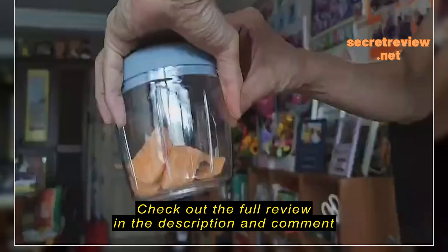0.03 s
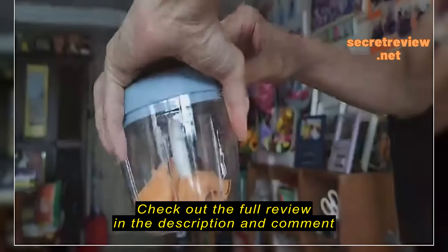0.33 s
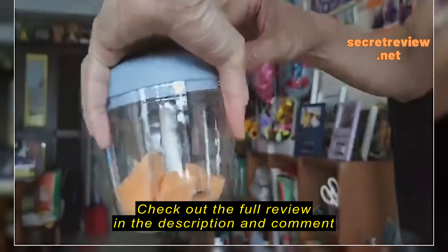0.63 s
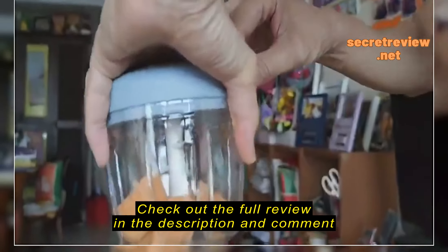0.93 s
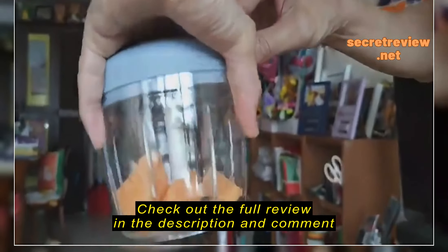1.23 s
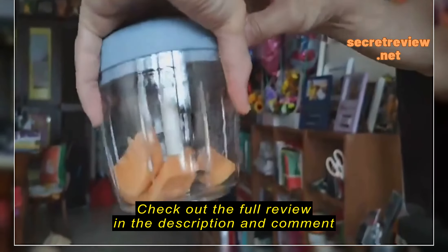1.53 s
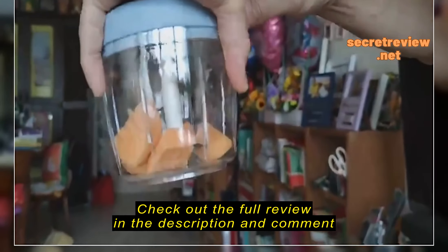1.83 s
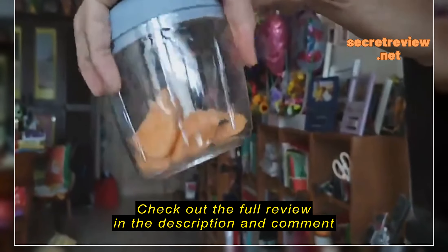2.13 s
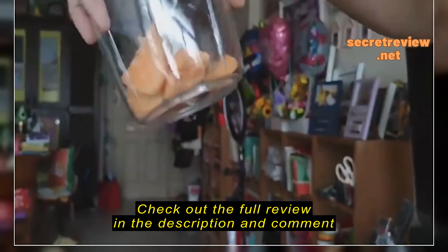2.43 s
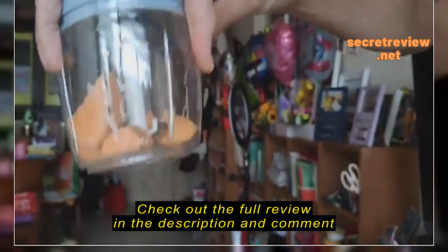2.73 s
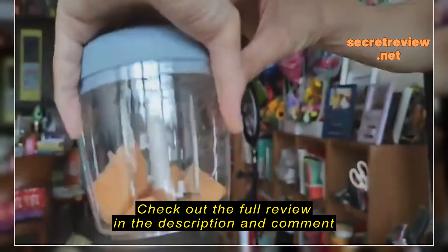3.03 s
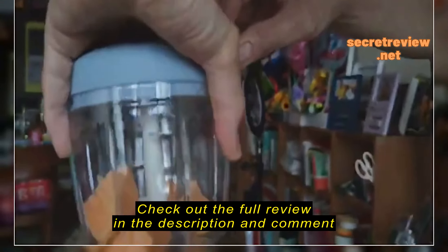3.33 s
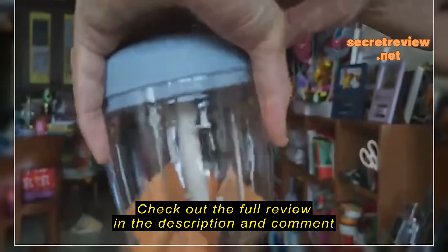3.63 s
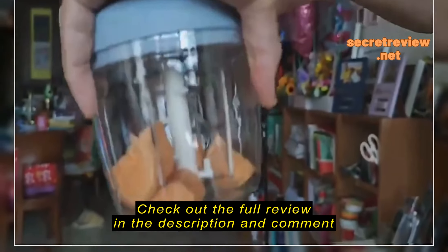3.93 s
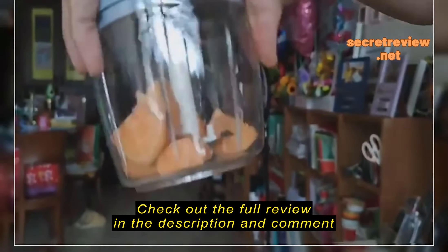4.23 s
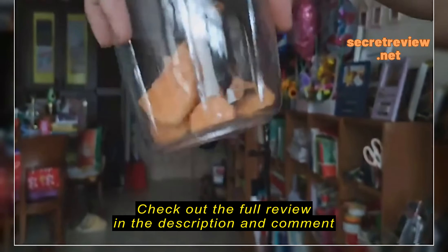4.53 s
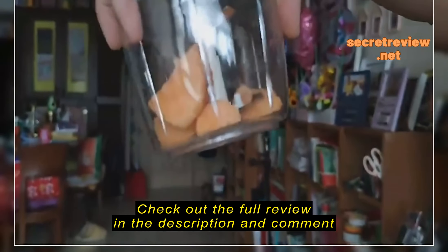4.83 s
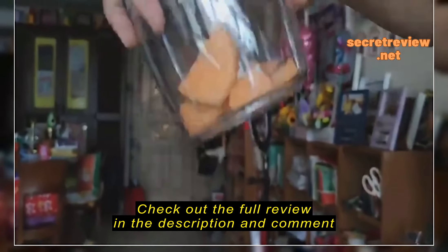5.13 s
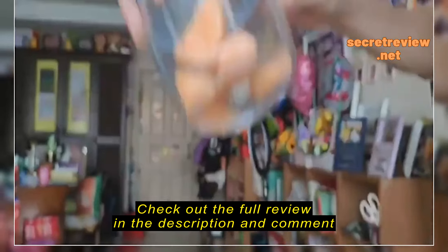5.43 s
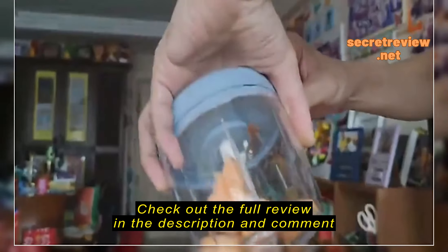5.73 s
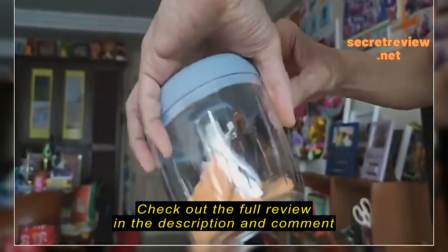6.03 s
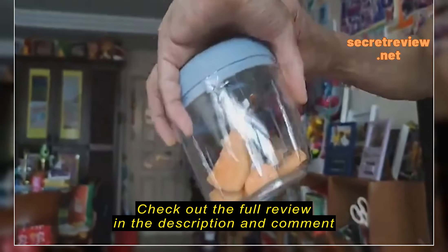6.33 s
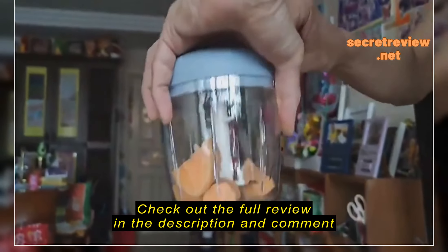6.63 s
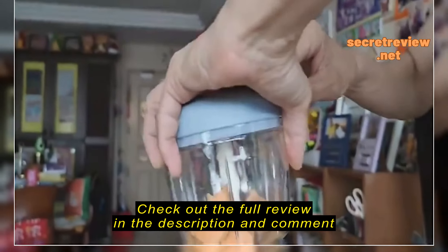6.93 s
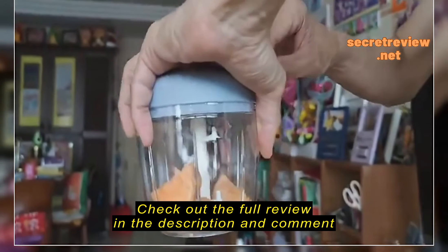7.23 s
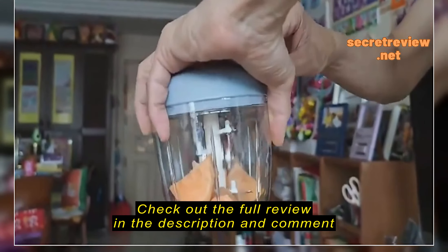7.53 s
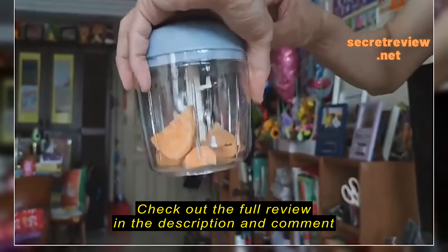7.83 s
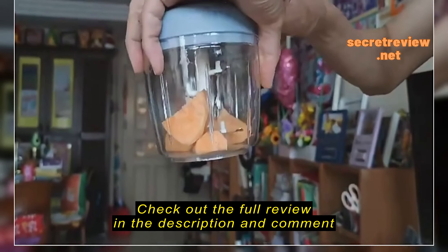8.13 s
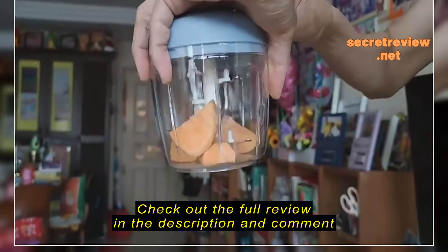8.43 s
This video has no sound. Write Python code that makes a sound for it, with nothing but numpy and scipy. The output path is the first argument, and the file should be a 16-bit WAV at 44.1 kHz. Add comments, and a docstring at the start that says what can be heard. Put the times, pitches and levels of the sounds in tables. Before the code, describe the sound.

Hard vegetable chunks are shaken in a lidded plastic cup, close to the microphone in a small, quiet room. From about 0.3 seconds they hit the wall in quick clusters of dry clacks, often paired, four or five a second, growing a little louder until 2.7 seconds. A short lull holds only faint taps and barely audible finger rubbing on the lid. Firm shaking resumes from 3.4 to 4.7 seconds, followed by a few light taps, then another run of clacks from 5.4 to 6.2 seconds. The pieces then shift more sparsely, with a duller knock near 6.9 seconds and tiny ticks after it. The loudest, sharp clack comes at 8 seconds, followed by two softer taps by about 8.4 seconds. A short reverberation trails the knocks, and faint hiss and a low rumble lie underneath throughout.

```python
"""In a small, quiet room, hard vegetable chunks are shaken in a lidded plastic cup near a two-port microphone.
At each turn of the hand they slide along the wall and land in a quick cluster of clacks, each impact
exciting the damped modes of the cup; between shakes a few pieces tap lightly and fingers rub on the lid.
A short reverberation follows the knocks, over faint hiss and a low rumble."""
import sys
import numpy as np
from scipy import signal
from scipy.fft import rfft, irfft, next_fast_len
from scipy.io import wavfile

SR = 44100
rng = np.random.default_rng(int(sys.argv[2]) if len(sys.argv) > 2 else 0)


def waveform_to_disk(signal):
    """Save audio, clipped to [-1, 1], as 16-bit WAV at the path in sys.argv[1]."""
    frames = np.transpose(np.atleast_2d(signal))
    scaled = np.clip(frames, -1, 1) * 32767
    samples = np.round(scaled).astype(np.int16)
    wavfile.write(sys.argv[1], SR, samples)


N = 373527


# The pile lands at each turn of the hand, one chunk on a corner and one flat. Each row: start in seconds,
# relative clack level in dB, thud and tick in dB over the clack, resonance of the struck spot in Hz,
# the flat chunk's delay in seconds, its clack in dB, its spot in Hz, and the skid level in dB.
PILE_LANDINGS = [(0.3189, -11.5, -9, 1, 2040, -.006, -16, 2450, -47.5),
                 (.4991, -19, -4.5, 7, 1660, .0048, -16.5, 2970, -40.5),
                 (0.7454, -12.5, -4, -2, 1500, -0.0065, -20, 850, -45.5),
                 (0.8746, -14.5, -4, 1, 2640, -0.0056, -15, 1730, -38),
                 (1.1057, -13, -10.5, -0.5, 3450, .0075, -8.5, 2760, -45),
                 (1.226, -12, -4, -5, 1610, 0.0063, -12.5, 815, -46),
                 (1.474, -13, -11, -5.5, 1890, -0.012, -13.5, 1510, -39),
                 (1.5991, -6.5, -11, -4.5, 2960, -0.0063, -14, 1560, -45),
                 (1.8376, -12, -11.5, -1, 1550, .0065, -8.5, 2680, -44),
                 (1.953, -6.5, -10.5, -6, 2510, 0.0026, -10.5, 3100, -48.5),
                 (2.2138, -7, -16, -1, 2400, 0.0042, -12.5, 2130, -37.5),
                 (2.343, -9, -6, -1, 1350, 0.0044, -11, 3070, -44),
                 (2.5884, -11, -15.5, -0.5, 2500, -0.014, -10.5, 2100, -37.5),
                 (2.7155, -8, -11, -5, 3000, -.014, -20, 700, -39),
                 (3.3839, -5, -14, -4.5, 2940, 0.0066, -18, 2820, -41.5),
                 (3.5957, -5, -6, 1, 3200, -0.004, -8.5, 1520, -40),
                 (3.8148, -8.5, -9, -1.5, 3020, 0.0069, -7, 2860, -42),
                 (3.982, -14, 3, 2, 690, -.005, -16.5, 860, -37),
                 (4.1849, -5.5, -9.5, 2, 1480, -.002, -6, 1040, -42),
                 (4.3257, -9, -8, -2.5, 2130, -0.0094, -9.5, 2050, -39.5),
                 (4.5417, -8.5, -15, -0.5, 2670, -.0106, -8.5, 1620, -40),
                 (4.6777, -14, -1, 1.5, 1500, -0.012, -17.5, 800, -36),
                 (5.398, -5, -11, 0.5, 1580, -0.0083, -10.5, 1330, -36.5),
                 (5.5552, -10.5, -1.5, -0.5, 2210, -0.0038, -9, 1490, -39),
                 (5.8027, -12, -10.5, 2, 2950, -0.0041, -10, 1480, -42.5),
                 (5.9506, -9, 1, -2.5, 1020, 0.0044, -13.5, 960, -40),
                 (6.2153, -11, -10, -1, 1800, -.0045, -10.5, 1780, -36),
                 (6.8798, -12.5, -1, -4, 1530, -.007, -22, 684, -40.5),
                 (8.0239, -.3, -9, -1.5, 1890, 0.006, -8.5, 1110, -51),
                 (8.2053, -15.5, -2.5, -3, 1730, .007, -19, 920, -43)]
# Pieces touch just before or after a landing, and a few tap between shakes.
# Each row: the first five columns of a landing.
LIGHT_TAPS = [(.3086, -22.5, -.5, -20, 706), (.7323, -22.5, -15, -8, 2090), (.8785, -22.5, 4, -9.5, 2040),
              (1.0961, -14, -13, -11, 1450), (1.216, -21, -1.5, -20, 1400), (1.2392, -17, -7, -16, 2070),
              (1.5891, -17.5, -3, -15.5, 1810), (1.8184, -19.5, -10, -12, 3080),
              (1.9698, -20.5, -2, -10, 2010), (2.1814, -19, -16, -16, 2400), (2.3315, -20.5, -3, -9, 1770),
              (2.3535, -16, -1, -10, 900), (2.5483, -21.5, -20, -5.5, 2070), (3.0112, -37, 0, 5, 1700),
              (3.0385, -30.5, 2, 3, 1060), (3.9429, -29, -1, -2, 1530), (3.9673, -15, -5, -13, 2820),
              (4.2018, -18.5, -6, -12, 1890), (4.3344, -14, -4, -21, 2030), (4.653, -28, 11, -20, 900),
              (4.6594, -17.5, -20, -8, 2800), (4.895, -25, -4, -11, 1340), (4.9439, -32, -5, -1, 2800),
              (4.964, -17, -0.5, -15, 1230), (5.126, -34, -2, -3, 900), (5.1573, -14.5, -.5, -11, 1400),
              (5.3795, -20.5, 4, -16, 970), (6.5711, -31.5, 5, 2, 1300), (6.8673, -34, 12, 16, 940),
              (7.1847, -36, -15, -2.5, 2700), (7.3908, -27, 0, -11, 1240), (7.8619, -30, 1, -5, 1270),
              (8.0116, -21, 4.5, -6, 760), (8.1922, -24.5, 3.5, -23, 670), (8.4281, -18.5, -9, -5.5, 1450)]

def contacts(strays=2, stray_db=-17, stray_within_s=.015):
    """Loose bodies collide one by one: lists each contact's start, clack, thud, tick and struck spot."""
    rows = list(LIGHT_TAPS)
    scatter = rng.uniform(-1, 1, (len(PILE_LANDINGS), strays, 2))
    for landing, offsets in zip(PILE_LANDINGS, scatter):
        start, db, thud_db, tick_db, spot_hz, delay_s, flat_db, flat_hz, _ = landing
        flat = (thud_db + 3, tick_db - 5.5)  # a flat face thuds more and ticks less than a corner
        rows.append((start, db, thud_db, tick_db, spot_hz))
        rows.append((start + delay_s, flat_db, *flat, flat_hz))
        for when, where in offsets:  # smaller pieces touch down at random
            rows.append((start + stray_within_s * when, db + stray_db, *flat, spot_hz * 2 ** (where / 2)))
    return rows


# Modes of the hand-damped cup. Each row: frequency in Hz, relative level in dB, 60 dB decay in seconds.
CUP_MODES = [(467, -8, .014), (610, -3.5, 0.023), (794, 0.5, 0.018), (990, 2, 0.018), (1170, 0, 0.017),
             (1410, -1.5, 0.023), (1620, -6, 0.018), (1854, -4, 0.027), (2157, 1.5, 0.015),
             (2590, -10, .01), (2660, 0, 0.016), (3132, -1, 0.023), (3505, 5, 0.008), (4200, 4, 0.007),
             (4685, -1, 0.026), (5380, 7.5, 0.0086), (6070, -2.5, 0.019), (6230, -16.5, 0.002),
             (7150, 2.5, 0.0094), (7880, -1.5, 0.014), (10040, -14, 0.01)]
# Hard flesh cracks and scrapes on plastic. Each row: frequency in Hz, relative spectral density in dB.
CRACK_SPECTRUM = [(60, -28.5), (200, -7.5), (500, -3.5), (1100, -2), (2900, -1.5), (3900, -16.5),
                  (4900, -6.5), (6200, -8), (8000, -7.5), (9200, -22.5), (11500, -26), (16000, -30)]
# The flesh passes little bass or extreme treble. Each row: frequency in Hz, gain in dB.
FLESH_RESPONSE = [(150, -19), (380, -6), (600, -1.5), (8500, -1.5), (11500, -7.5), (15000, -12)]
CRUSH_S = .004  # the flesh crunches this long before it stops dead

def knock(thud_db, tick_db, spot_hz, spot_db=7.5, spot_width=0.12, crack_t60=0.017):
    """Impact excitation: a blow rings the cup, and contact hardness shares the energy among bands."""
    t = np.arange(SR // 25) / SR - CRUSH_S
    after = np.maximum(t, 0)
    force_db = np.where(t < 0, -7 + 18 * t / CRUSH_S, -60 * after / crack_t60)  # rising crunch, then crack
    crack = coloured(rng.standard_normal((2, len(t))), CRACK_SPECTRUM) * amp(force_db)
    crack = correlated(crack, [(800, 0.82), (2500, 0.59), (5000, 0.082)])  # the wall scatters its treble
    spectrum = rfft(unit(ringing(CUP_MODES, after, detune=0.031)) + unit(crack))
    hz = np.linspace(1, SR / 2, spectrum.shape[1])
    spectrum *= amp(spot_db * resonance(hz, spot_hz, spot_width))
    power = np.mean(abs(spectrum) ** 2, axis=0) / len(hz)
    bands_hz = [(300, 1300), (1300, 3700), (3700, 10000)]
    thud, clack, tick = [10 * np.log10(power[(hz > lo) & (hz < hi)].sum()) for lo, hi in bands_hz]
    hardness = [(1100, thud_db - thud), (1500, -clack), (3300, -clack), (4200, tick_db - tick)]
    return irfft(spectrum * amp(along(hardness, hz) + along(FLESH_RESPONSE, hz)))


# Clusters of close wall modes.
# Each row: centre in Hz, width in Hz, relative level in dB, 60 dB decay in seconds.
WALL_CLUSTERS = [(2100, 160, -44, .25), (2420, 110, -39.5, .28), (2680, 160, -37, .28),
                 (2950, 200, -39, .28), (4620, 170, -38, .25), (4890, 170, -34.5, .27)]

def chunks(knock_db=2.8, ring_db=-9, near_spot_db=3.5):
    """Superposition: every contact knocks the cup, and the blows' energies add in the wall's faint ring."""
    out, t = np.zeros((2, N)), np.arange(SR // 4) / SR
    touches = contacts()
    for start, db, thud_db, tick_db, spot_hz in touches:
        add(out, start - CRUSH_S, amp(db + knock_db) * knock(thud_db, tick_db, spot_hz))
    start, db, _, tick_db, spot_hz = np.transpose(touches)
    for hz, width, mode_db, t60 in WALL_CLUSTERS:
        drive_db = db + tick_db * (hz > 3700)  # hard, ticking blows drive the high modes
        drive_db += near_spot_db * resonance(hz, spot_hz, width=0.15)
        blows = np.bincount((start * SR).astype(int), amp(drive_db + ring_db) ** 2, N)
        energy = signal.oaconvolve(blows, amp(mode_db - 60 * t / t60) ** 2)[:N]
        out += np.sqrt(abs(energy)) * np.array([noise_band(hz, width), noise_band(hz, width)])
    return out


def skids(ramp_db=39.6, rise_s=0.059, fall_s=0.062, slips_per_s=4000):
    """Sliding friction: tiny slips grow louder as the pile nears the wall and fade as it settles."""
    t, level = np.arange(N) / SR, np.zeros(N)
    for start, *_, db in PILE_LANDINGS:
        centre = round(start * SR)
        near = slice(max(centre - SR // 5, 0), centre + SR // 5)
        ramp = np.maximum((start - t[near]) / rise_s, (t[near] - start) / fall_s)
        level[near] += amp(db - ramp_db * ramp)
    slips = rng.standard_normal((2, N)) * (rng.random(N) < slips_per_s / SR)
    scrape = correlated(coloured(slips, CRACK_SPECTRUM), [(800, 0.75), (2500, 0.91), (5000, .1)])
    return level * unit(scrape)


# The cup swings in the hand. Each row: frequency in Hz, relative level in dB, 60 dB decay in seconds.
SWING_MODES = [(146, -8, 0.02), (227, 5.5, 0.016), (302, -3.5, 0.041), (369, 2, 0.042)]

def jolts(level_db=-36.5, db_per_thud_db=.25, upstroke_db=-11, attack_s=0.0015):
    """Momentum transfer: each landing bumps the cup against the fingers, harder on the downstroke."""
    out, t = np.zeros(N), np.arange(SR // 12) / SR
    for k, (start, db, thud_db, *_) in enumerate(PILE_LANDINGS):
        bump = ringing(SWING_MODES, t, detune=0.044) * (1 - np.exp(-t / attack_s))
        bump_db = level_db + db_per_thud_db * (db + thud_db) + upstroke_db * (k % 2 == 0)
        add(out, start, amp(bump_db) * bump)
    return out


# Each row: start in seconds, relative level in dB, 60 dB decay in seconds.
CORNER_SNAPS = [(2.2123, -30, 0.0089), (2.3431, -33, .004), (3.976, -36, .008), (4.1845, -25, 0.012),
                (5.396, -33, .006), (5.9497, -16, 0.0014), (6.2153, -32, .007), (8.0235, -28, 0.0077)]
# Each row: frequency in Hz, relative spectral density in dB.
SNAP_SPECTRUM = [(4000, -25), (8500, 6), (10000, 12), (11500, -9), (15000, -5)]

def snaps(level_db=-6):
    """A brief contact has a bright spectrum: sharp corners click on the plastic."""
    out, t = np.zeros((2, N)), np.arange(SR // 50) / SR
    for start, db, t60 in CORNER_SNAPS:
        noise = unit(coloured(rng.standard_normal((2, len(t))), SNAP_SPECTRUM))
        add(out, start, amp(db + level_db - 60 * t / t60) * noise)
    return out


# Fingers shift on the lid. Each row: centre in seconds, level in dB, half-width in seconds.
GRIP_SHIFTS = [(3.053, -60.5, 0.11), (4.898, -57.5, 0.049), (5.1, -62, 0.05), (6.157, -63, 0.055),
               (6.48, -61, 0.058), (7.218, -65, 0.22)]
# Each row: frequency in Hz, relative spectral density in dB.
SKIN_SPECTRUM = [(80, 9.5), (200, 8), (500, 1.5), (1200, -3.5), (2200, -3), (3800, -10), (4900, -3),
                 (6500, -19), (8000, -7), (10000, -30)]

def fingers(slips_per_s=700):
    """Stick-slip friction of skin on plastic makes a faint, dull crackle."""
    t = np.arange(N) / SR
    level = sum(amp(db) * np.exp(-((t - centre) / width) ** 2) for centre, db, width in GRIP_SHIFTS)
    slips = rng.standard_normal(N) * (rng.random(N) < slips_per_s / SR)
    return level * unit(coloured(slips, SKIN_SPECTRUM))


# Each row: frequency in Hz, reverberation time in seconds.
REVERB_TIMES = [(200, 0.53), (600, 0.43), (2500, 0.41), (5000, 0.42), (10000, 0.37)]
# Each row: frequency in Hz, gain of the reflections in dB.
REVERB_COLOUR = [(100, -20), (250, -4), (400, 2.5), (900, -1), (1700, -1.5), (3000, -0.5), (4000, 1),
                 (5200, -1), (7000, -2), (9300, 4), (15000, 7)]
# Each row: frequency in Hz, left minus right level of the reflections in dB.
REVERB_BALANCE = [(60, -1.5), (120, -4), (240, -2), (480, -0.5), (950, 0), (1890, 2.5), (3770, -14),
                  (7520, 2), (15000, -8)]

def reverberation(x, build_s=0.0011, delay_s=0.0009):
    """Diffuse field: the room stores the energy of each band and releases it in exponential decay."""
    hz, t, spectra = signal.stft(x, SR, nperseg=128)
    age = np.maximum(t[t < .5] - delay_s, 0)
    decay = (amp(-60 * age / along(REVERB_TIMES, hz)[:, None]) * (1 - np.exp(-age / build_s))) ** 2
    decay /= np.mean(decay.sum(axis=1))
    power = np.mean(abs(spectra) ** 2, axis=0)
    energy = signal.fftconvolve(power, decay, axes=1)[:, :len(t)]
    noise = signal.stft(rng.standard_normal((2, N)), SR, nperseg=128)[2]
    wash = signal.istft(noise / np.std(noise) * np.sqrt(abs(energy)), SR, nperseg=128)[1][:, :N]
    wash = correlated(wash, [(200, 1.0), (900, 0.22), (2000, 0.048), (4000, 0)])
    return ports(coloured(wash, REVERB_COLOUR), REVERB_BALANCE, lead_ms=0)


# Each row: frequency in Hz, relative spectral density of the room tone in dB.
AIR_SPECTRUM = [(12, -3), (24, 2), (40, -5), (60, -2), (85, -13.5), (190, -13), (330, -19.5), (450, -24),
                (560, -22.5), (1100, -29.5), (2500, -34.5), (5500, -38), (9000, -39), (15500, -39)]
# Each row: frequency in Hz, left-right correlation of the room tone.
AIR_CORRELATION = [(60, 0.75), (180, 0.91), (550, 0.51), (1650, -0.24), (4970, 0.039), (15000, -0.087)]
# Low hums and a thin treble hiss. Each row: centre in Hz, width in Hz, level in dB.
HUMS = [(26, 6.7, -60), (54.7, 14.2, -58), (117.5, 12, -72), (197.5, 14, -71), (7770, 470, -81.5)]
# The rumble rises and falls. Each row: time in seconds, contour in dB before centring and scaling.
RUMBLE_CONTOUR = [(0.36, -61), (0.4, -55), (1.15, -56.5), (2.96, -53), (3.16, -48), (3.27, -61),
                  (3.63, -50), (3.79, -57), (3.97, -51), (4.15, -61), (4.29, -51), (5.1, -56), (5.35, -49),
                  (5.51, -57), (5.96, -53), (8.47, -54)]

def room_tone(air_db=-53, swell_depth=0.44):
    """Ambient noise: a broad hiss and narrow, wavering hums, amplitude-modulated in the bass."""
    air = unit(correlated(coloured(rng.standard_normal((2, N)), AIR_SPECTRUM), AIR_CORRELATION))
    tone = amp(air_db) * air + sum(amp(db) * noise_band(hz, width) for hz, width, db in HUMS)
    times, db = np.transpose(RUMBLE_CONTOUR)
    swell = amp(swell_depth * np.interp(np.arange(N) / SR, times, db - np.mean(db)))
    return tone + (swell - 1) * coloured(tone, [(80, 3.5), (200, -39)])


def ringing(modes, t, detune, spread_db=2.5):
    """Modal sum: each point of impact gives the damped modes new strengths, signs and tuning."""
    hz, db, t60 = np.transpose(modes)[:, :, None]
    size, shift, sign = rng.standard_normal((3, len(modes), 1))
    envelope = np.sign(sign) * amp(db + spread_db * size - 60 * t / t60)
    return np.sum(envelope * np.sin(2 * np.pi * hz * (1 + detune * shift) * t), axis=0)


def resonance(hz, spot_hz, width):
    """The struck spot favours frequencies near its own: a bell curve in log frequency."""
    return np.exp(-(np.log(hz / spot_hz) / width) ** 2)


def ports(x, balance, lead_ms):
    """Level and time differences share x between the two ports; the left leads by lead_ms."""
    def response(hz):
        left = amp(along(balance, hz))
        phase = np.exp(1j * np.pi * hz * lead_ms / 1000)
        return np.array([left * phase, 1 / phase]) * np.sqrt(2 / (1 + left ** 2))
    return filtered(x, response)


def correlated(pair, correlation):
    """Mid-side mixing gives two independent signals a correlation set by (Hz, value) points."""
    def response(hz):
        angle = np.arccos(np.clip(along(correlation, hz), -1, 1)) / 2
        return np.array([np.cos(angle), np.sin(angle)])
    mid, side = filtered(pair, response)
    return np.array([mid + side, mid - side])


def noise_band(centre, width):
    """Band-pass noise of rms 1."""
    return unit(filtered(rng.standard_normal(N), lambda hz: 1 / (1 + (2 * (hz - centre) / width) ** 4)))


def coloured(x, points):
    """Spectral shaping by a (Hz, dB) curve."""
    return filtered(x, lambda hz: amp(along(points, hz)))


def filtered(x, response):
    """Linear filtering: the spectrum times a frequency response."""
    n = x.shape[-1]
    padded = next_fast_len(n + 8192)
    return irfft(rfft(x, padded) * response(np.fft.rfftfreq(padded, 1 / SR)), padded)[..., :n]


def along(points, hz):
    """Interpolation of (Hz, value) points in log frequency."""
    knots_hz, values = np.transpose(points)
    return np.interp(np.log(hz + 1), np.log(knots_hz + 1), values)


def add(track, start, x):
    """Superposition of x on the track from start seconds on."""
    part = track[..., max(round(start * SR), 0):][..., :x.shape[-1]]
    part += x[..., :part.shape[-1]]


def amp(db):
    """Decibels to gain."""
    return 10 ** (np.asarray(db) / 20)


def unit(x):
    """Normalisation to rms 1."""
    return x / np.sqrt(np.mean(x ** 2) + 1e-20)


# The two ports hear the cup differently. Each row: frequency in Hz, left minus right level in dB.
DIRECT_BALANCE = [(250, -1.5), (600, 2), (1200, 2), (2150, 5), (2700, -2), (3400, -14.5), (4900, -16),
                  (6200, -7), (7500, 3), (9500, 10), (12000, -10)]

def scene(reverb_db=-10):
    """The direct sound of the cup, its reverberant field and the room tone add linearly."""
    cup = chunks() + skids() + jolts() + snaps() + fingers()
    return ports(cup, DIRECT_BALANCE, lead_ms=0.11) + amp(reverb_db) * reverberation(cup) + room_tone()


# Each row: time in seconds, gain in dB.
FADE_IN = [(.14, -83), (0.172, -16.5), (.22, -8), (.29, -0.5)]

def record(dry):
    """A quick fade-in and an ideal low-pass filter."""
    fade = amp(np.interp(np.arange(N) / SR, *np.transpose(FADE_IN)))
    return filtered(dry * fade, lambda hz: hz < 15700)


dry = scene()
out = record(dry)
waveform_to_disk(out)
```